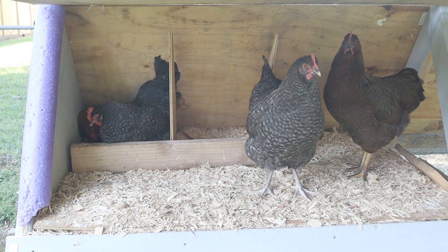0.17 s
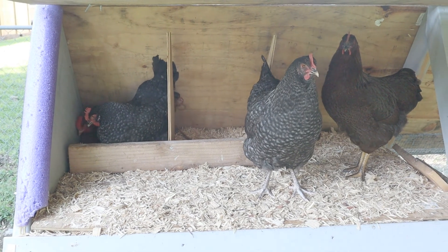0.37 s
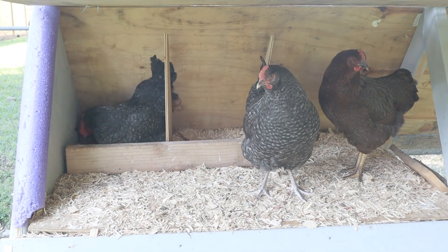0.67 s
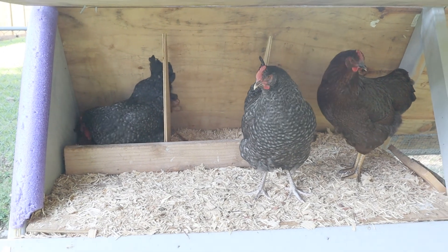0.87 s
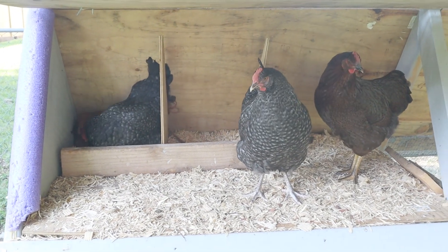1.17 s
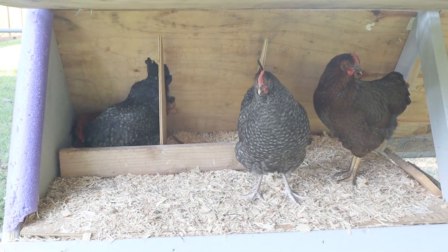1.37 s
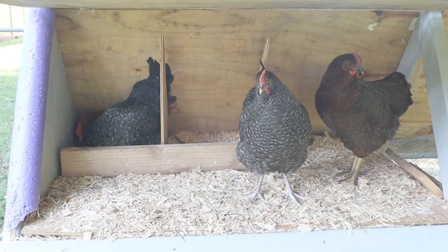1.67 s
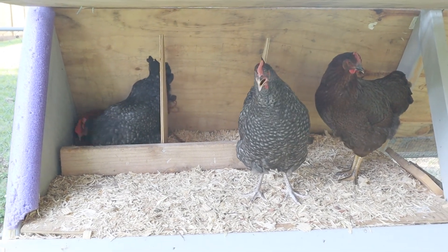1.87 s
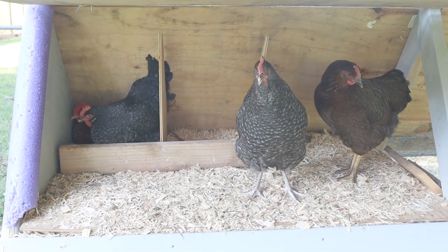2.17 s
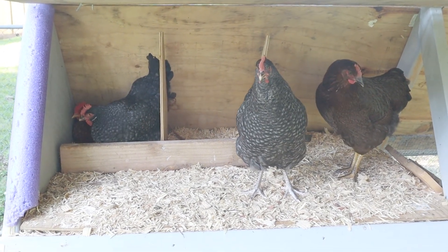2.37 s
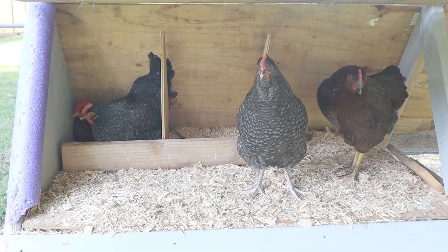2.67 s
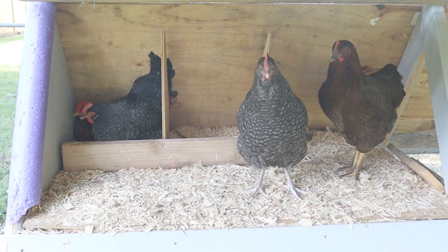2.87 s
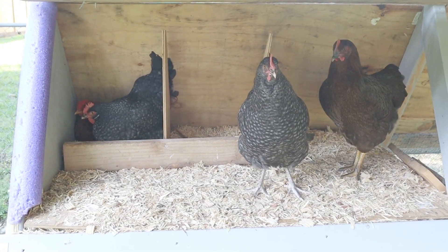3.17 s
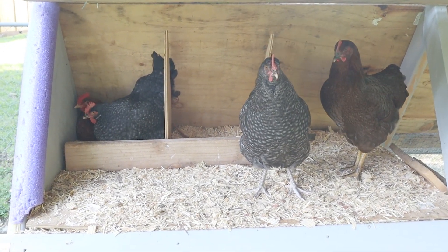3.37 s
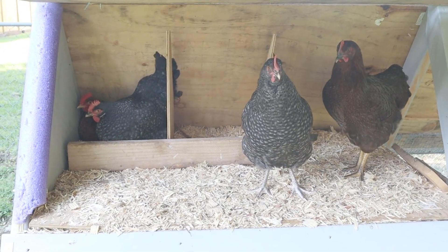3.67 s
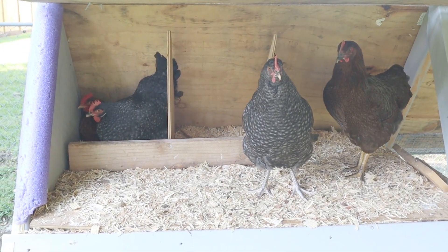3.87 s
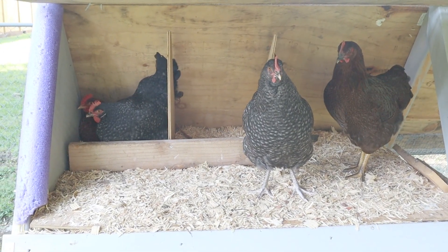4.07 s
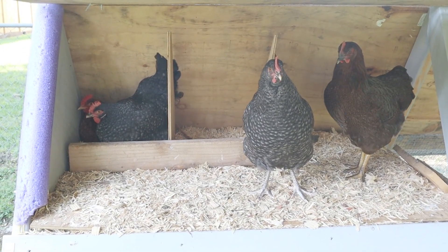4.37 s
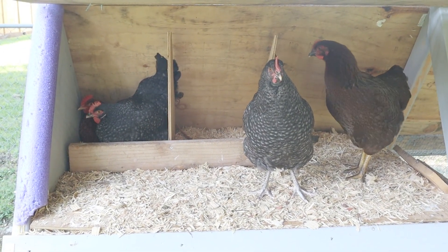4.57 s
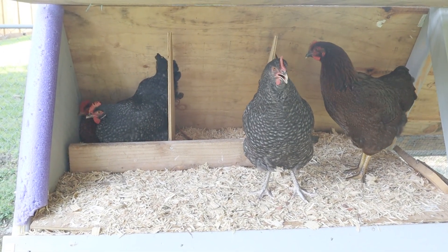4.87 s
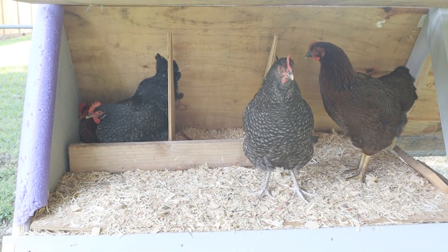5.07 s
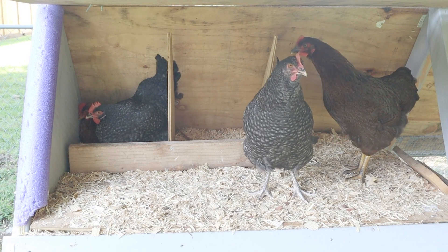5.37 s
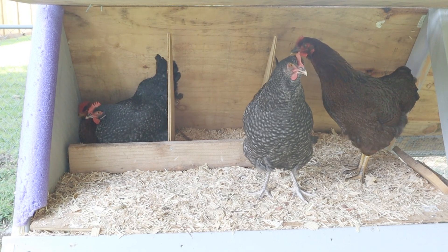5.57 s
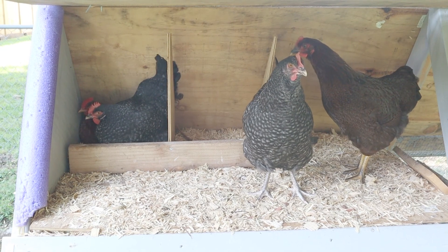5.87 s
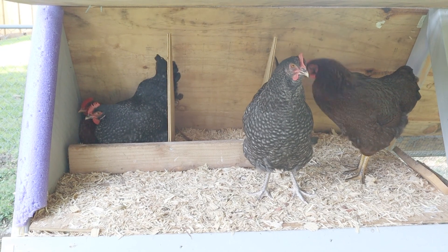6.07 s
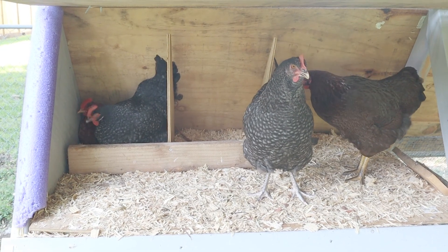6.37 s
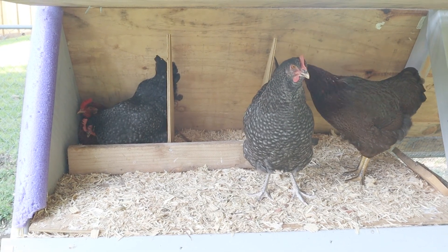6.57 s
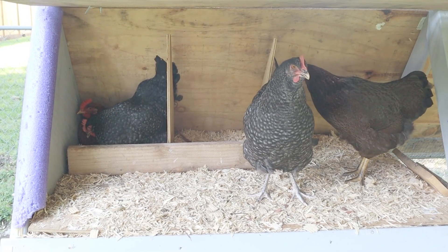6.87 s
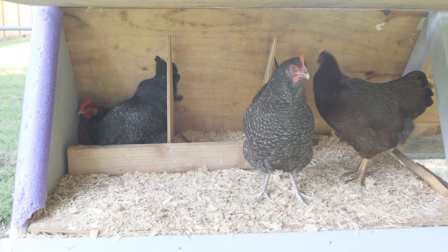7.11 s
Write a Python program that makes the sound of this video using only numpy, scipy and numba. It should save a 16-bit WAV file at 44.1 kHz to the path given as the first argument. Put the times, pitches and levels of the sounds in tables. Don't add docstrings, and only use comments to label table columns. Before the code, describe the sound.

A near hen's evenly spaced, muted clucks mix with another hen's falling coos, then stop. She clucks and bursts into a raspy squawk that breaks upward on its second syllable. Small throat pips and mutters fill the lull as a cock crows faintly far away. She squawks again, then clucks regularly to the end. The planks give a short dull reflection; outdoors is a soft rumble with insects.

```python
import sys
import numpy as np
from scipy import signal
from scipy.io import wavfile
from scipy.ndimage import uniform_filter1d
from numba import njit

SR = 44100
rng = np.random.default_rng(int(sys.argv[2]) if len(sys.argv) > 2 else 0)


def linear_from_db(decibels):
    return 10 ** (np.asarray(decibels, float) / 20)


def output_pcm(signal):
    pcm = np.clip(np.atleast_2d(signal).T, -1, 1) * 32767
    wavfile.write(sys.argv[1], SR, np.round(pcm).astype(np.int16))


N = 319284
TIME = np.arange(N) / SR


def level(x, db):
    return x * linear_from_db(db) / np.sqrt(np.mean(x ** 2))


@njit
def svf(x, hz, width):
    y = np.empty(len(x))
    band_state, low_state = 0., 0.
    for i in range(len(x)):
        g, k = np.tan(np.pi * hz[i] / SR), width[i] / hz[i]
        v = (band_state + g * (x[i] - low_state)) / (1 + g * (g + k))
        band_state = 2 * v - band_state
        low_state += 2 * g * v
        y[i] = k * v
    return y


def ring(x, hz, width):
    return svf(x + 1e-18, hz + 0 * TIME, np.maximum(width + 0 * TIME, 5))


def band(hz, width):
    return ring(ring(rng.standard_normal(N), hz, width), hz, width)


def walk(rate):
    hold = int(SR / rate)
    steps = np.repeat(rng.standard_normal(N // hold + 1), hold)
    return uniform_filter1d(uniform_filter1d(steps, hold), hold)[:N]


def yard():
    # frequency in Hz, level in dB per Hz.
    spectrum = [(20, -16.5), (40, -6.5), (100, -1), (190, -7), (290, -19), (900, -22.5), (1200, -23),
                (1700, -30.5), (2300, -27.5), (3600, -25), (6000, -20), (6900, -27.5), (7700, -39),
                (16000, -38)]
    # hum line in Hz, level in dB.
    hum_lines = [(118.4, -66), (177.6, -60.5), (236.9, -61)]
    hz, db = np.transpose(spectrum)
    rumble, swell = 0, walk(1.0)
    for centre in 25 * 2 ** np.arange(0, 9.4, 1 / 5):
        band_db = np.interp(np.log(centre), np.log(hz), db) + 0.3 * swell + 0.78 * walk(18)
        rumble = rumble + linear_from_db(band_db) * band(centre, centre / 5)
    hum = sum(level(band(line_hz, 8.3), line_db) for line_hz, line_db in hum_lines)
    insects = level(band(4620, 200), -68) * linear_from_db(2.5 * walk(2.3))
    return level(rumble, -49.5) + hum + insects


def far_hens():
    # start in seconds, end in seconds, level in dB.
    spells = [
        (3.917, 4.146, -60.5),
        (4.4, 4.706, -58.5),
    ]
    blur = level(band(850, 220), 0) + level(band(1360, 250), -2.5)
    swell = 0
    for start, end, db in spells:
        share = np.clip((TIME - start) / (end - start), 0, 1)
        swell = swell + linear_from_db(db) * np.sin(np.pi * share) ** .5
    return blur * swell * linear_from_db(4.2 * walk(25.0))


def song(calls, orders, wobble):
    out = np.zeros(N)
    for call in calls:
        s, hz, db = np.transpose(call)
        pitch_hz = np.interp(TIME, s, hz) * (1 + wobble * walk(73))
        phase = 2 * np.pi * np.cumsum(pitch_hz) / SR
        edge = np.clip(np.minimum(TIME - s[0], s[-1] - TIME) / 0.0019, 0, 1)
        gain = edge * linear_from_db(np.interp(TIME, s, db) + 1.1 * walk(39))
        for k, order_db in orders:
            flicker_db = 3.1 * (k > 1) * walk(45)
            out += np.sqrt(2) * gain * linear_from_db(order_db + flicker_db) * np.sin(k * phase)
    return out


def far_cock():
    # time in seconds, pitch in Hz, level in dB.
    crows = [
        [(3.05, 790, -80), (3.15, 790, -68.5), (3.3, 778, -71), (3.4, 760, -76)],
        [(3.82, 790, -89), (3.95, 776, -68), (4.08, 758, -71), (4.18, 754, -89.5)],
    ]
    # multiple of the pitch, level in dB.
    orders = [(1, -7), (2, -2), (3, 0), (4, 6.5), (5, -2)]
    return song(crows, orders, wobble=0.0091)


def tail(hz, t60_s, db, delay_s):
    age = TIME[:SR // 2] - delay_s
    fade = band(hz, 3.1 * hz)[:SR // 2] * linear_from_db(-60 * age / t60_s) * (age > 0)
    return linear_from_db(db) * fade / np.sqrt(np.sum(fade ** 2))


def coop(x):
    planks = tail(1085, t60_s=0.06, db=-16.5, delay_s=0.0029)
    fences = tail(1600, t60_s=0.51, db=-44, delay_s=0.11)
    return x + signal.fftconvolve(x, planks + fences)[:N]


def pecks():
    # start in seconds, level in dB, mode in Hz, T60 in ms.
    pips = [
        (2.752, -31.5, 1137, 32),
        (2.947, -43, 1074, 29),
        (4.18, -41, 782, 35),
        (4.25, -35.5, 730, 50),
        (4.392, -38, 702, 41),
        (4.738, -32, 718, 45),
    ]
    out = np.zeros(N)
    for s, db, hz, ms in pips:
        age = np.maximum(TIME - s, 0)
        attack = np.minimum(age / 0.0041, 1)
        out += linear_from_db(db - 60 * age / (ms / 1000)) * attack * np.sin(2 * np.pi * hz * age)
    return out


def coos():
    # time in seconds, pitch in Hz, level in dB.
    notes_sung = [
        [(0.083, 662, -39), (0.095, 608, -46), (0.109, 548, -32.5), (0.163, 584, -39), (0.185, 579, -81)],
        [(0.272, 673, -42), (0.294, 697, -42), (0.306, 608, -38.5), (0.382, 587, -37), (0.408, 590, -43),
         (0.435, 515, -52)],
        [(0.537, 577, -52), (0.547, 605, -41.5), (0.563, 534, -34), (0.575, 527, -39)],
    ]
    # multiple of the pitch, level in dB.
    orders = [(1, 3.5), (2, -16.5), (3, -32)]
    return song(notes_sung, orders, wobble=0.031)


@njit
def valve(hz, gain, jitter, scatter, weak, chance):
    out = np.zeros(len(hz) + 1)
    phase, k = 1., 0
    for i in range(len(hz)):
        if gain[i] == 0:
            phase = 1.
            continue
        step = hz[i] * np.exp(jitter[i] * chance[k, 0]) / SR
        phase += step
        if phase >= 1:
            phase, k = phase - 1, k + 1
            size = gain[i] * np.exp(scatter[i] * chance[k, 1]) * (1 - weak[i] * (k % 2))
            early = min(phase / step, 1.)
            out[i] += size * early
            out[i + 1] += size * (1 - early)
    return out[:-1]


def tract(x, modes, beak, count, flicker_db):
    out = 0
    for k, row in enumerate(modes):
        hz, width, db = (shut + (wide - shut) * beak for shut, wide in np.reshape(row, (3, 2)))
        y = x
        for _ in range(count):
            y = ring(y, hz, width)
        gain = linear_from_db(db + flicker_db * walk(40)) * np.sqrt(SR / (2 * np.pi * width))
        out = out + (-1) ** k * gain * y
    return out


def neck(beak):
    # start in seconds, end in seconds, first Hz, last Hz, sinking time in seconds.
    stretches = [
        (1.803, 2.32, 3015, 1710, .19),
        (4.937, 5.44, 2942, 1774, 0.085),
    ]
    hz, db, dip = 2310 + 0 * TIME, -23.5 + 0 * TIME, 0.31 + 0 * TIME
    shut_db, wide_db = -21.5, -9
    for start, end, first_hz, last_hz, sink_s in stretches:
        on = (TIME >= start) & (TIME < end)
        age = np.maximum(TIME - start, 0)
        hz = np.where(on, last_hz + (first_hz - last_hz) * np.exp(-age / sink_s), hz)
        db = np.where(on, shut_db + (wide_db - shut_db) * beak, db)
        dip = np.where(on, 1.3 * np.minimum(age / .07, 1) * np.exp(-age / .6), dip)
    return hz, db, dip


def voice(calls, chest_db, bright_db, jitter=.26, scatter=0.43, low_rasp_db=-22, high_rasp_db=-10.5):
    # Hz shut, Hz open, width shut in Hz, width open in Hz, dB shut, dB open.
    throat = [(314.5, 658, 500, 490, -7, -5), (790, 760, 81, 174, 0.5, 0), (1111, 1215, 71, 154, -10.5, 3),
              (1530, 2110, 260, 210, -18, -11.5)]
    # Hz, width in Hz, level in dB, each shut and open.
    palate = [(3436, 3670, 220, 270, -19.5, -9.5)]
    # Hz, width in Hz, level in dB.
    beak_modes = [(4560, 4290, 590, 1400, -35.5, -9), (5000, 4980, 370, 600, -45.5, -24.5),
                  (6900, 6800, 600, 540, -49.5, -23.5), (8300, 7860, 550, 1700, -42.5, -22.5),
                  (10200, 9480, 1000, 2900, -44, -13.5), (12850, 11970, 1500, 2200, -42.5, -24.5),
                  (14586, 13000, 2000, 5000, -44, -24.5)]
    rows = np.vstack(calls)
    s, hz, db, beak, chaos, weak = (np.interp(TIME, rows[:, 0], column) for column in rows.T)
    sounding = sum((TIME >= c[0][0]) & (TIME < c[-1][0]) for c in calls) > 0
    gain = sounding * linear_from_db(db + 5.0) * np.sqrt(SR / hz)
    chance = np.clip(rng.standard_normal((8192, 2)), -2, 1.6)
    pulses = valve(hz, gain, jitter * chaos, scatter * chaos, weak, chance)

    puff = np.exp(-np.arange(256) / (0.0016 * SR))
    rasp = (.1 + chaos) * np.convolve(pulses, puff)[:N] * rng.standard_normal(N) / 2
    snap = pulses * chaos * .8 * rng.standard_normal(N)
    beak = np.clip(beak, 0, 1)
    low = pulses + linear_from_db(low_rasp_db) * rasp
    high = 1.005 * ring(pulses, 4000., 11000.0) + linear_from_db(high_rasp_db) * rasp

    neck_hz, neck_db, dip = neck(beak)
    gullet = linear_from_db(neck_db + 14.5) * beak * ring(high, neck_hz, 450.)
    out = tract(low, throat, beak, count=1, flicker_db=2.0) + gullet
    out = out - linear_from_db(bright_db) * tract(high, palate, beak, count=1, flicker_db=3.0)
    out = signal.sosfilt(signal.butter(2, 4600, fs=SR, output="sos"), out)
    out = out + linear_from_db(bright_db) * tract(high + snap, beak_modes, beak, count=2, flicker_db=6.0)
    out = out - np.clip(dip, 0, 1) * ring(out, 1.3 * neck_hz, 620.0)
    out = out - 0.65 * ring(out, 6050., 600.)
    out = out - np.clip(0.97 * chaos * beak, 0, 1) * ring(out, hz, 260.)
    out = out + linear_from_db(chest_db - 18 * chaos * beak) * ring(pulses, hz, 120.)
    return signal.sosfilt(signal.butter(2, 150, "high", fs=SR, output="sos"), out)


def cluck(row, shape, slow_hz, early, chaos, weak):
    s, ms, top_hz, db, beak = row
    share, shape_db = np.transpose(shape)
    early_hz = early * top_hz
    climb_hz = [min(slow_hz, early_hz), min(1.25 * slow_hz, early_hz), early_hz, top_hz, top_hz]
    hz = np.interp(share, [0, .13, .28, .55, 1], climb_hz)
    opening = beak * np.interp(share, [0, .25, .4, .55, .8, 1], [0.069, 0.1, 0.44, 0.99, 0.84, .4])
    settle = np.interp(share, [.3, .6], [1.2, .75])
    return np.column_stack([s + share * ms / 1000, hz, db + shape_db, opening, chaos * settle, weak + 0 * share])


def second_hen():
    # start in seconds, length in ms, top pulse rate in Hz, level in dB, beak opening 0-1.
    mutters = [(.572, 28, 405, -41.5, 0.3), (2.706, 20, 215, -53.5, .1), (2.907, 14.7, 239, -44, 0.31),
               (3.59, 32.8, 169.6, -43, .05), (3.705, 41, 314.5, -42.5, .1), (3.851, 47, 327, -41.5, 0.036),
               (4.064, 25.8, 399, -39.5, .16), (4.091, 16, 386, -42, .3), (4.2132, 29.6, 430, -41.5, .17),
               (4.3568, 24.5, 424, -43.5, .11), (4.522, 33.3, 453, -45, 0.12), (4.764, 7.2, 365, -39, .21)]
    # share of length 0-1, level in dB.
    shape = [(0, -5), (0.302, 2.5), (.7, -1), (1, -11)]
    calls = [cluck(row, shape, slow_hz=340, early=.96, chaos=.28, weak=.4) for row in mutters]
    return voice(calls, chest_db=11, bright_db=-14)


def squawk(curve):
    # start in seconds, end in seconds, chaos 0-1, weakening of
    spells = [
        (1.845, 1.895, .5, .2),
        (1.89, 1.96, .45, .4),
        (2.14, 2.172, .4, .2),
        (2.165, 2.218, .07, .8),
        (4.96, 5.05, .55, .3),
        (5.04, 5.12, .3, .4),
        (5.225, 5.298, .5, .4),
    ]
    at, rate, loud = np.transpose(curve)
    s = np.linspace(at[0], at[-1], num=100)
    hz, db = np.interp(s, at, rate), np.interp(s, at, loud)
    late = s > (at[0] + at[-1]) / 2
    steady_chaos, slack_chaos = .04, .5
    chaos = np.where(late, np.interp(hz, [380, 460], [slack_chaos, steady_chaos]), 2 * steady_chaos)
    weak = 0 * s
    for start, end, spell_chaos, spell_weak in spells:
        inside = np.clip(np.minimum(s - start, end - s) / .015 + .5, 0, 1)
        chaos = np.maximum(chaos, inside * spell_chaos)
        weak = np.maximum(weak, inside * spell_weak)
    shut_hz, wide_hz = 40, 530.6
    opening = (hz - shut_hz) / (wide_hz - shut_hz)
    return np.column_stack([s, hz, db, opening, chaos, weak])


def hen():
    # start in seconds, length in ms, top pulse rate in Hz, level in dB, beak opening 0-1.
    clucks = [(-.04, 46, 186, -35.5, 0.24), (0.2297, 42.4, 183, -27.5, 0.07),
              (.4569, 44.8, 187.4, -29.5, 0.31), (0.6961, 38, 177.5, -28, 0.06),
              (1.726, 52.2, 200, -27, 0.46), (2.3652, 45, 374, -23, 0.61), (2.569, 47.3, 343.1, -24, 0.46),
              (4.6527, 48.8, 187.3, -31.5, 0.21), (4.852, 52.2, 253.5, -23.5, 0.55),
              (5.482, 42.5, 364.4, -23, 0.48), (5.692, 48.3, 343.6, -21.5, 0.56),
              (5.9428, 52, 318, -22.5, 0.65), (6.191, 51.6, 310.5, -22.5, 0.68),
              (6.4277, 53.4, 316.3, -21.5, 0.75), (6.6633, 52.7, 323, -22, 0.83),
              (6.92, 51.8, 311, -23, 0.7), (7.1486, 48.3, 322.6, -22.5, 0.79)]
    # share of length 0-1, level in dB.
    shape = [(0, -12), (.13, -4.5), (0.278, 0.5), (.42, -0.5), (.55, -1.5), (.8, 1.5), (0.921, -2),
             (1, -18.5)]
    # time in seconds, pulse rate in Hz, level in dB.
    bawks = [
        [(1.816, 388, -20.5), (1.825, 426, -16), (1.836, 516.5, -16.5), (1.865, 400.2, -16.5),
         (1.915, 416, -16.5), (1.96, 492, -14.5), (1.995, 452.6, -21.5), (2.03, 240.6, -21),
         (2.056, 151.3, -36)],
        [(4.94, 397.6, -20), (4.948, 441.7, -16), (4.965, 521.4, -16.5), (4.99, 429.4, -18),
         (5.03, 418.4, -15.5), (5.06, 490.6, -18), (5.092, 488.8, -13), (5.112, 436.3, -24.5),
         (5.162, 189, -28)],
    ]
    # time in seconds, pulse rate in Hz, level in dB.
    gawks = [
        [(2.097, 151.9, -34.5), (2.115, 202, -18.5), (2.155, 225, -23.5), (2.175, 514.5, -12.5),
         (2.205, 533, -13.5), (2.222, 482, -10.5), (2.245, 484.7, -20.5), (2.27, 253, -32), (2.293, 169, -32.5)],
        [(5.212, 229.6, -29.5), (5.235, 359.7, -20.5), (5.275, 445, -21.5), (5.296, 503.4, -15.5),
         (5.32, 474.6, -16), (5.34, 490.1, -11), (5.357, 452.8, -27), (5.38, 301, -31.5), (5.402, 187, -35)],
    ]
    calls = [cluck(row, shape, slow_hz=138, early=.86, chaos=.17, weak=.12) for row in clucks]
    calls += [squawk(curve) for curve in bawks + gawks]
    return voice(sorted(calls, key=lambda c: c[0, 0]), chest_db=-8.0, bright_db=0)


def scene():
    birds = hen() + second_hen() + coos() + pecks()
    return (coop(birds) + far_cock() + far_hens() + yard())[None]


def band_limit(x):
    return signal.sosfilt(signal.butter(12, 16500, fs=SR, output="sos"), x)


def record(dry):
    rounded = np.tanh(0.54 * dry) / 0.65
    top_cut = signal.ellip(10, .3, 30, 15820, fs=SR, output="sos")
    return band_limit(signal.sosfilt(top_cut, rounded))


dry = scene()
out = record(dry)
output_pcm(out)
```